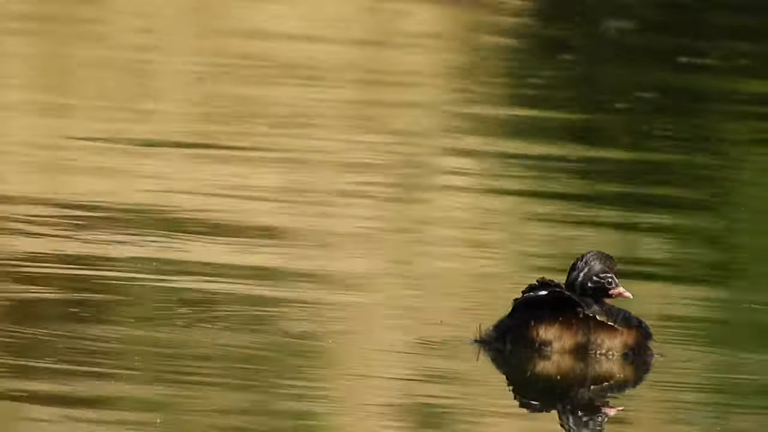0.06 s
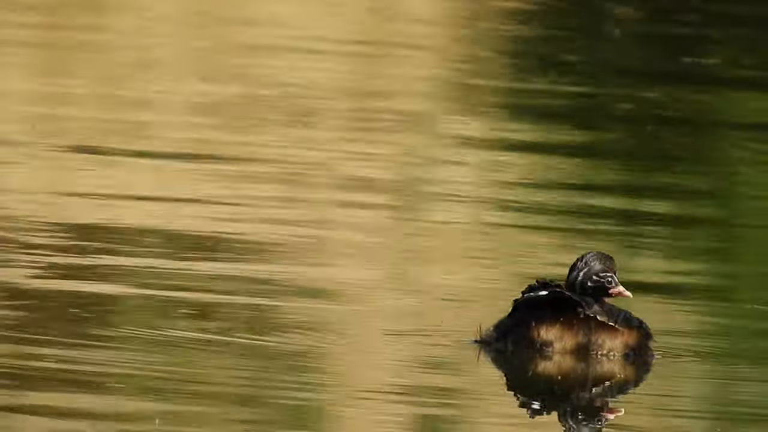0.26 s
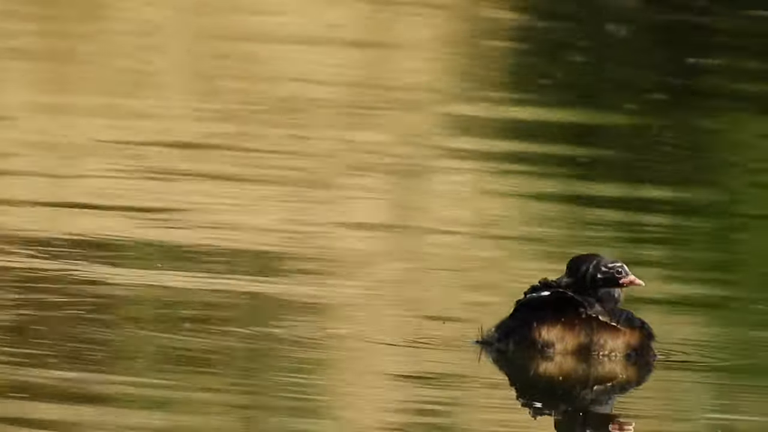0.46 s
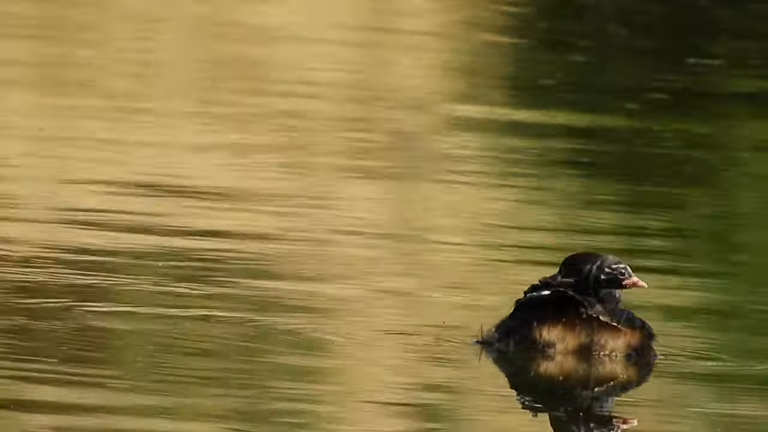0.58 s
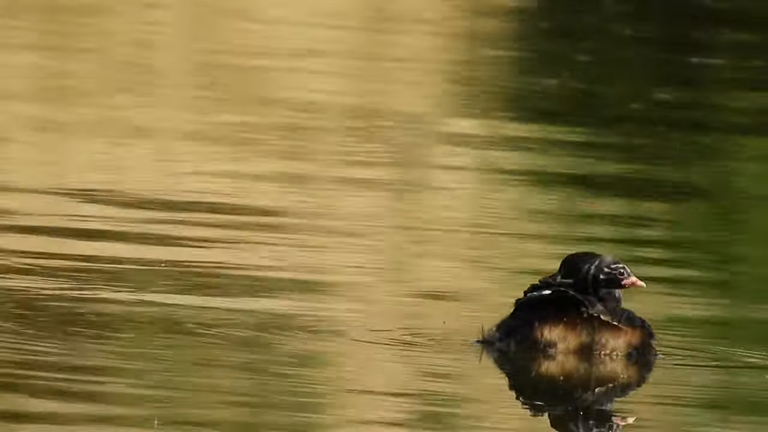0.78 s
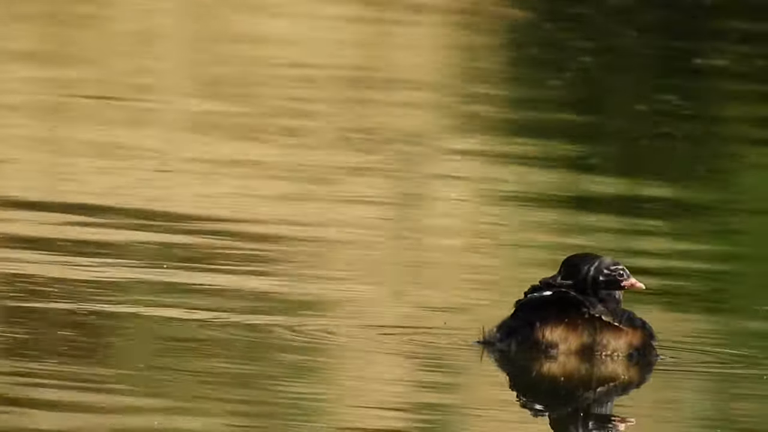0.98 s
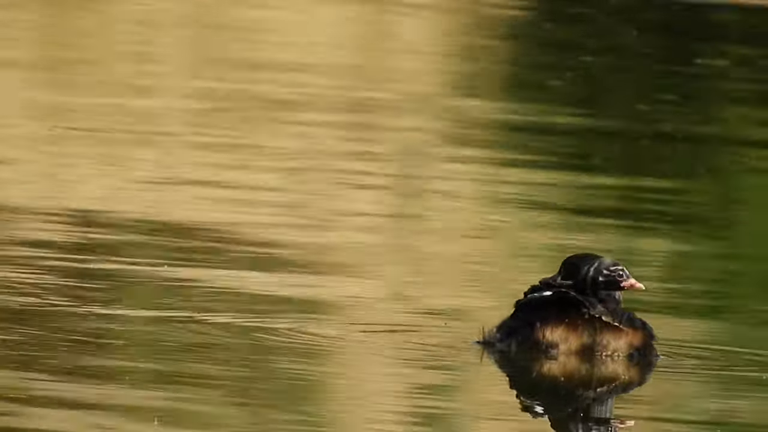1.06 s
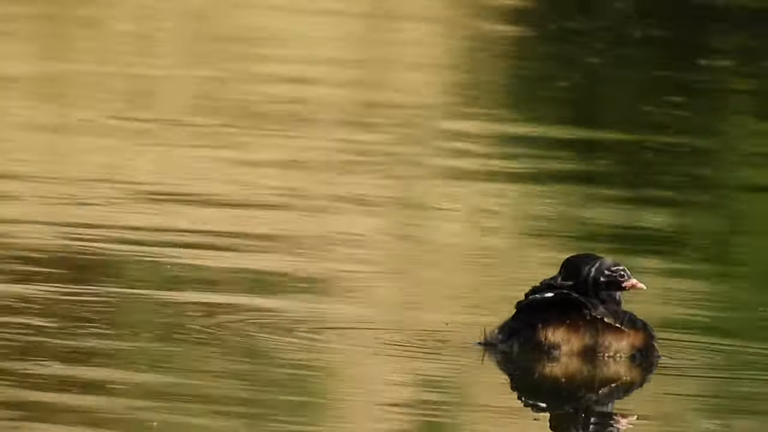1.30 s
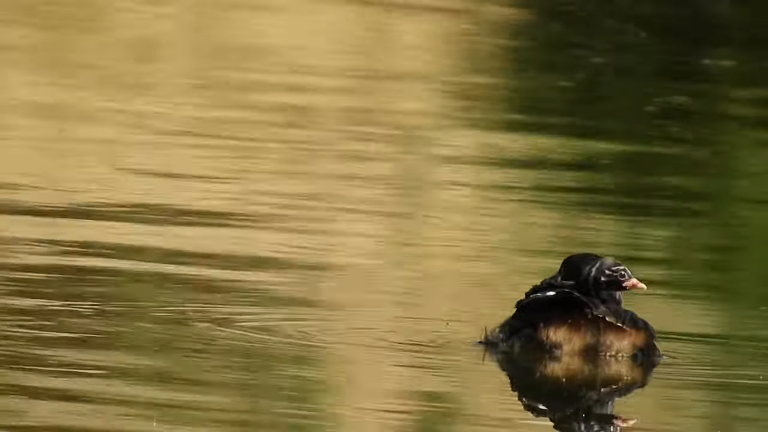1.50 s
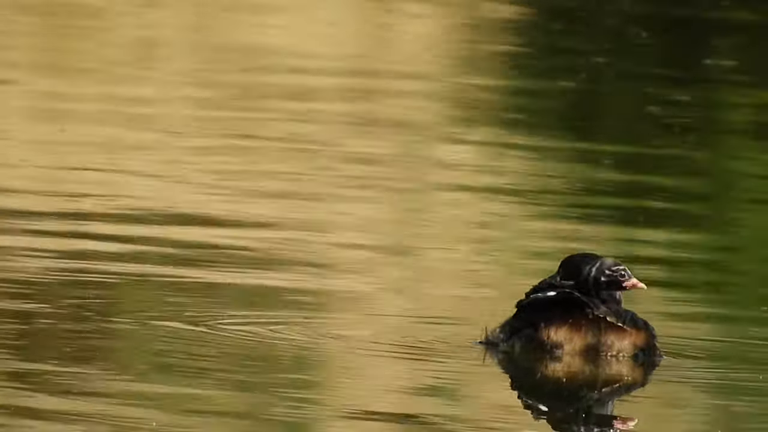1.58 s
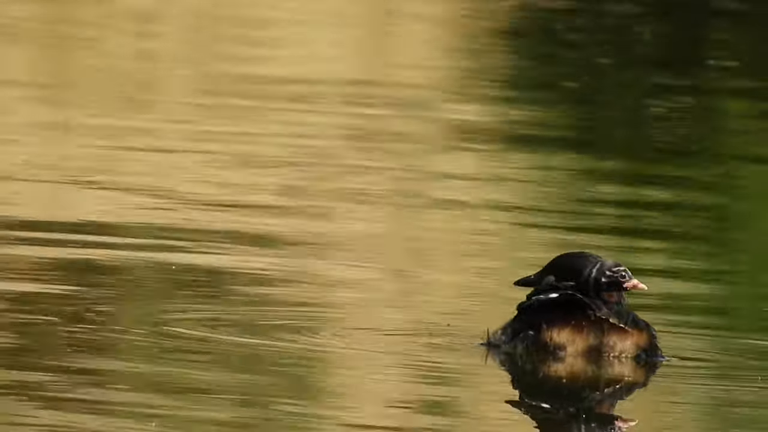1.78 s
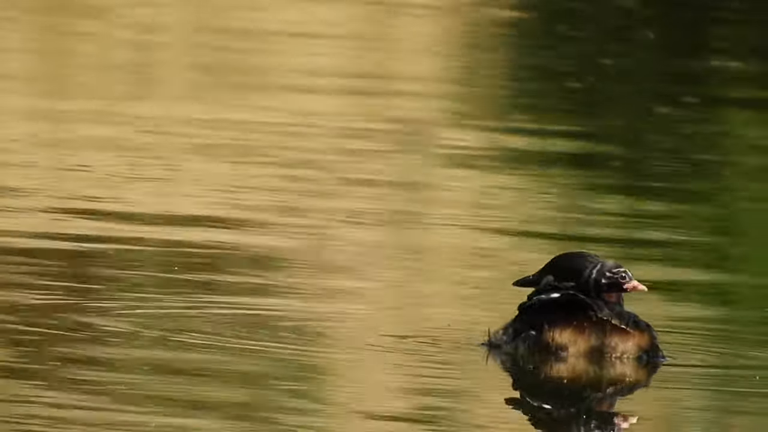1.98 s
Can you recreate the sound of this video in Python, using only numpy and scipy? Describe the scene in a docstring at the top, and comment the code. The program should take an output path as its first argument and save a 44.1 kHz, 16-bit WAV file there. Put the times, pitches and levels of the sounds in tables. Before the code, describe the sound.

A puff of wind hits the microphone with a loud, dull thump and flutters away. Two tiny rustles and a few soft puffs follow, while low hum, thin camera whine and hiss continue beside calm water.

```python
"""Wind on a microphone at a quiet pond

A puff of wind thumps the left microphone port, and its eddies flutter briefly on both ports.
A limiter ducks the sound at the thump and recovers slowly. Later come two faint, short rustles.
Beneath lie a low rumble and hum, with the motor whine, electronic whistle and hiss of a camera."""
import sys
import numpy as np
from scipy.fft import rfft, irfft, next_fast_len
from scipy.io import wavfile
from scipy.ndimage import uniform_filter1d, minimum_filter1d, map_coordinates

SR = 44100
rng = np.random.default_rng(int(sys.argv[2]) if len(sys.argv) > 2 else 0)


def put_to_file(sound):
    """Save the sound as 16-bit audio at rate SR, in the file named by the first command-line argument."""
    columns = np.atleast_2d(sound).T  # one column per channel
    safe = np.clip(columns, -1, 1)
    whole_steps = np.round(safe * 32767)
    wavfile.write(sys.argv[1], SR, whole_steps.astype(np.int16))


N = 90404

# Every width is the standard deviation of a Gaussian envelope.
# puffs on each port (time [s], width [s], frequency [Hz], envelope peak [dB])
LEFT_PUFFS = [(.4695, 0.015, 60.5, -20.5), (.505, 0.0026, 120, -20), (.538, 0.0058, 74.5, -15.5),
              (.6365, 0.0037, 118, -18), (1.232, .012, 55, -34)]
RIGHT_PUFFS = [(0.4249, 0.015, 85, -15), (0.455, 0.0047, 94, -17), (.5527, 0.0055, 101, -16.5),
               (0.67, 0.0089, 81, -20.5), (1.829, 0.015, 97, -29), (2.04, 0.0093, 55, -24)]
# eddies on the ports (time [s], width [s], left level [dB], right level [dB])
EDDIES = [(0.094, 0.03, -49, -38), (0.183, 0.0068, -27, -53), (0.226, 0.015, -34, -26),
          (0.304, 0.023, -28.5, -26.5), (0.511, 0.091, -33, -32), (.78, 0.034, -43.5, -39)]
# rustles (time [s], width [s], scuff level [dB], crisp end level [dB])
RUSTLES = [(1.517, 0.0052, -49, -55.5), (1.633, 0.013, -48, -51.5)]
# hollow tones in the rustles (time [s], width [s], frequency [Hz], glide [Hz/s], level [dB])
HOLLOW_TONES = [(1.517, 0.0066, 520, 0.5, -52.5), (1.527, .007, 1070, 0, -55),
                (1.627, 0.0069, 1110, -6000, -48), (1.634, 0.011, 530, -8000, -51.5)]
# dull bumps and tiny ticks (time [s], width [s], level [dB])
BUMPS = [(.055, 0.0058, -47), (.255, 0.024, -50.5), (.46, 0.012, -52.5), (.71, 0.036, -51)]
TICKS = [(.458, 0.00054, -52), (.53, .002, -49)]
# envelope of the motor's main tone (time [s], level [dB])
WHINE_ENVELOPE = [(0, -57), (.07, -48.5), (.19, -54.5), (.22, -59.5), (.3, -47.5), (.35, -60.5), (.45, -50),
                  (.6, -53.5), (.75, -51), (1.24, -51), (1.28, -56), (1.31, -50), (1.6, -52.5), (1.69, -61),
                  (1.79, -50), (2.05, -50.5)]
# envelopes of the motor's noise bands (time [s], whirr level [dB], airy band level [dB])
WHIRR_ENVELOPES = [(0, -52, -59), (.1, -56, -57), (.24, -55, -57.5), (.33, -49.5, -61.5), (.53, -56.5, -61),
                   (.67, -55, -59), (.92, -51.5, -61), (1.35, -52.5, -60.5), (1.54, -55, -61),
                   (1.66, -53, -60.5), (1.8, -53.5, -63.5), (2.05, -53, -62.5)]
# line spectra of motor, housing, electronics and hum (frequency [Hz], level [dB])
MOTOR_PARTIALS = [(1076, -73), (1642.2, -62.5), (1742.5, -63.5), (1817, -74), (2183.5, -75), (2256, -75.5)]
HOUSING_MODES = [(1535, -65.5), (1620, -65)]
WHISTLE_LINES = [(2984.9, -71), (3084.8, -62), (3184.9, -74), (4527.3, -77), (4727.4, -79)]
HUM_LINES = [(49.5, -50), (101, -53), (174.3, -43)]
# spectral densities of the noises (frequency [Hz], relative level [dB])
EDDY_SPECTRUM = [(15, -31), (35, -9), (60, -4), (90, -2), (135, -3), (200, -21), (300, -32.5), (700, -69),
                 (2000, -92)]
SCUFF_SPECTRUM = [(200, -29), (480, 3), (580, -2), (780, -10), (1100, 0.5), (1400, -28), (2200, -27),
                  (4000, -23), (9000, -45.5)]
CRISP_SPECTRUM = [(2000, 2), (4500, 7), (6500, 2), (9000, 8), (11500, -22), (16000, -25)]
BUMP_SPECTRUM = [(150, -13), (290, -10), (360, -1), (430, -15), (600, -41), (2000, -54)]
WHIRR_SPECTRUM = [(300, -13), (700, -10.5), (950, -9), (1080, -7), (1250, -8.5), (1360, -4.5), (1430, 4.5),
                  (1530, 0), (1620, -7.5), (1730, -5), (1850, -17.5), (2250, -17.5), (2400, -32),
                  (3050, -12), (3350, -23.5), (4600, -17.5), (7000, -46)]
AIRY_SPECTRUM = [(1300, -30), (1850, -3), (2200, -2), (2450, -9), (2900, -5), (3400, -12), (6000, -34)]
RUMBLE_SPECTRUM = [(15, -28), (30, -11), (48, 6.5), (70, -4.5), (105, 2), (150, -2.5), (205, -2.5),
                   (240, -13.5), (272, -24), (305, -20.5), (400, -27.5), (700, -32.5), (1400, -53)]
HISS_SPECTRUM = [(200, -5), (600, 4.5), (1500, 1), (2500, 0.5), (3600, -0.5), (4700, 3), (6500, 0.5),
                 (9300, -3), (11300, -8.5), (14500, -11.5), (16000, -24)]
SIZZLE_SPECTRUM = [(6000, -30), (8500, -3.5), (9500, 0), (11500, -19)]


def wind_thump(at_s=0.3293):
    """A pressure transient on the left port: one heavy swing, a dull tick and a soft rebound."""
    swing = puff(at_s, width_s=0.0026, hz=112, db=4.5)
    tick = amp(-17.5) * swell(at_s + 0.00307, width_s=0.000286)
    rebound = amp(-11) * swell(at_s + 0.0099, width_s=0.0012)
    return np.array([swing - tick + rebound, np.zeros(N)])


def wind_flutter():
    """Turbulent pressure is local, so eddies and puffs strike each port separately."""
    strength = sum(amp([[left], [right]]) * swell(s, width) for s, width, left, right in EDDIES)
    thuds = np.array([sum(puff(*row) for row in port) for port in (LEFT_PUFFS, RIGHT_PUFFS)])
    return thuds + strength * noise(EDDY_SPECTRUM, correlation=0)


def puff(at_s, width_s, hz, db):
    """A wave packet: a low swing of air pressure under a Gaussian envelope."""
    return amp(db) * swell(at_s, width_s) * np.sin(2 * np.pi * hz * (at_s - clock()))


def rustles(end_lag_s=0.0097, end_width_s=0.0062):
    """Two noise transients, each a soft scuff with hollow tones and a delayed, crisp end."""
    scuffs = [(s, width, db) for s, width, db, _ in RUSTLES]
    ends = [(s + end_lag_s, end_width_s, db) for s, _, _, db in RUSTLES]
    hollows = sum(amp(db) * swell(s, width) * tone(hz + glide * (clock() - s), drift_hz=8.33)
                  for s, width, hz, glide, db in HOLLOW_TONES)
    return hollows + bursts(scuffs, SCUFF_SPECTRUM) + bursts(ends, CRISP_SPECTRUM)


def bumps():
    """Noise bursts with their energy at low frequencies are heard as soft, dull bumps."""
    return bursts(BUMPS, BUMP_SPECTRUM)


def camera_motor(whine_hz=1452.4, drift_hz=1.062):
    """A small motor radiates tonal whine and broadband whirr; its housing resonates faintly."""
    whine_db, = envelopes(WHINE_ENVELOPE)
    whirr_db, airy_db = envelopes(WHIRR_ENVELOPES)
    whine = amp(whine_db - 0.5 * wobble(22.2)) * tone(whine_hz, drift_hz)
    partials = wavering_tones(MOTOR_PARTIALS, waver_db=2.5, waver_per_s=8.1, drift_hz=drift_hz)
    whirr = amp(whirr_db + 1.16 * wobble(15.16)) * noise(WHIRR_SPECTRUM, correlation=0.89)
    airy_band = amp(airy_db) * noise(AIRY_SPECTRUM, correlation=0.89)
    housing = wavering_tones(HOUSING_MODES, waver_db=5.3, waver_per_s=11, drift_hz=22)
    return pan(-2) * (whine + partials + whirr + airy_band + housing)


def electronic_whistle():
    """A line spectrum from the camera's electronics: a thin whistle with sidebands."""
    return pan(-2) * wavering_tones(WHISTLE_LINES, waver_db=1.46, waver_per_s=11.9, drift_hz=0.54)


def rumble():
    """Three hum lines stand on a continuous low spectrum, nearly coherent in both channels."""
    hum = wavering_tones(HUM_LINES, waver_db=3.2, waver_per_s=7.7, drift_hz=0.78)
    low_noise = amp(-38 + 0.13 * wobble(4.6)) * noise(RUMBLE_SPECTRUM, correlation=0.95)
    return pan(-1) * (hum + low_noise)


def microphone_hiss():
    """The noise floor of the two microphone channels is steady and almost uncorrelated."""
    return pan(-0.5) * amp(-53.5) * noise(HISS_SPECTRUM, correlation=0.027)


def left_sizzle():
    """High-frequency noise and tiny ticks, in the left channel alone."""
    sizzle = amp(-63.5) * noise(SIZZLE_SPECTRUM, correlation=0)
    return [[1], [0]] * (sizzle + bursts(TICKS, CRISP_SPECTRUM))


def bursts(events, spectrum):
    """Amplitude modulation by Gaussian envelopes shapes noise into short swells."""
    envelope = sum(amp(db) * swell(s, width) for s, width, db in events)
    return envelope * noise(spectrum, correlation=0.95)


def wavering_tones(lines, waver_db, waver_per_s, drift_hz):
    """Superposed sines, each randomly modulated in level and frequency."""
    return sum(amp(db + waver_db * wobble(waver_per_s)) * tone(hz, drift_hz) for hz, db in lines)


def tone(hz, drift_hz):
    """A sine of rms 1 whose phase is the integral of a wandering frequency."""
    cycles = np.cumsum(hz + drift_hz * wobble(14)) / SR + rng.random()
    return np.sqrt(2) * np.sin(2 * np.pi * cycles)


def noise(spectrum, correlation):
    """Coloured stereo noise of rms 1; the ratio of mid to side sets the left-right correlation."""
    knots_hz, db = np.transpose(spectrum)
    white = rng.standard_normal((2, N))
    mid, side = filtered(white, lambda hz: amp(np.interp(np.log(hz + 1), np.log(knots_hz + 1), db)))
    angle = np.arccos(correlation) / 2
    mid, side = np.cos(angle) * mid, np.sin(angle) * side
    stereo = np.array([mid + side, mid - side])
    return stereo / np.sqrt(np.mean(stereo ** 2) + 1e-20)


def filtered(x, response):
    """Linear filtering multiplies the spectrum by a frequency response."""
    size = next_fast_len(N + SR // 2)
    return irfft(rfft(x, size) * response(np.fft.rfftfreq(size, 1 / SR)), size)[..., :N]


def swell(at_s, width_s):
    """A Gaussian envelope of peak 1."""
    return np.exp(-((clock() - at_s) / width_s) ** 2 / 2)


def wobble(knots_per_s):
    """A smooth curve through random knots."""
    return map_coordinates(rng.standard_normal(512), [clock() * knots_per_s], mode="wrap")


def envelopes(rows):
    """Linear interpolation of each level column over time."""
    times, *columns = np.transpose(rows)
    return [np.interp(clock(), times, column) for column in columns]


def pan(left_minus_right_db):
    """Channel gains for a level difference."""
    return amp([[left_minus_right_db / 2], [-left_minus_right_db / 2]])


def amp(db):
    """Decibels to amplitude ratio."""
    return 10 ** (np.asarray(db) / 20)


def clock():
    """Time of every sample in seconds."""
    return np.arange(N) / SR


def scene():
    """Superposition: the pressures of background, wind and small stirrings add."""
    background = rumble() + camera_motor() + electronic_whistle() + microphone_hiss() + left_sizzle()
    return background + wind_thump() + wind_flutter() + rustles() + bumps()


def record(dry):
    """Peak limiting ducks both channels and releases slowly; a low-pass filter limits the band."""
    ceiling_db, release_db_per_s, cutoff_hz = -0.45, 16, 15700
    peak_db = 20 * np.log10(np.abs(dry).max(axis=0) + 1e-9)
    excess_db = np.maximum(peak_db - ceiling_db, 0)
    recovery_db = release_db_per_s * clock()
    duck_db = np.maximum.accumulate(excess_db + recovery_db) - recovery_db
    held_gain = minimum_filter1d(amp(-duck_db), size=129)  # falls just ahead of the peak
    smooth_gain = uniform_filter1d(held_gain, size=129)
    return filtered(dry * smooth_gain, lambda hz: hz < cutoff_hz)


dry = scene()
out = record(dry)
put_to_file(out)
```